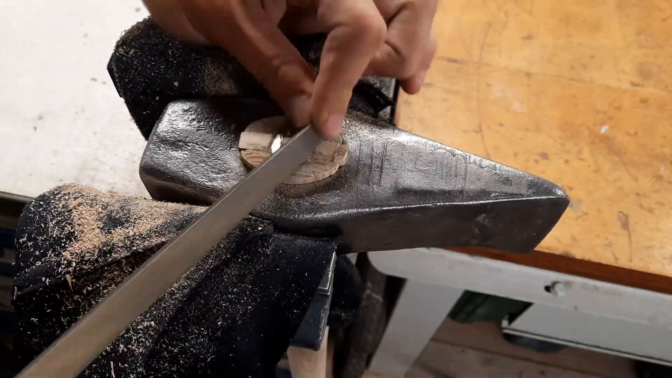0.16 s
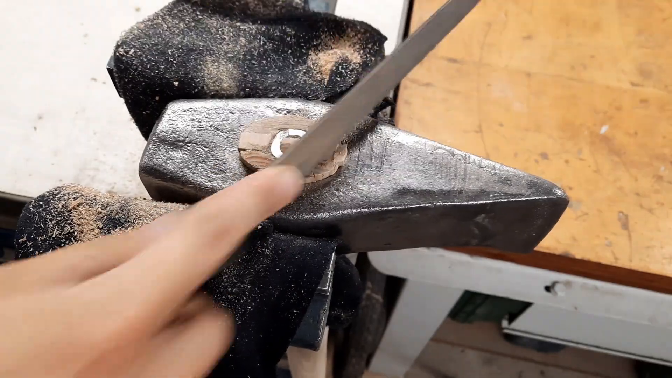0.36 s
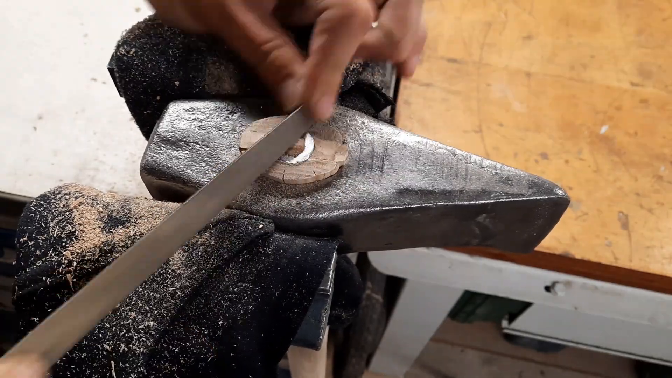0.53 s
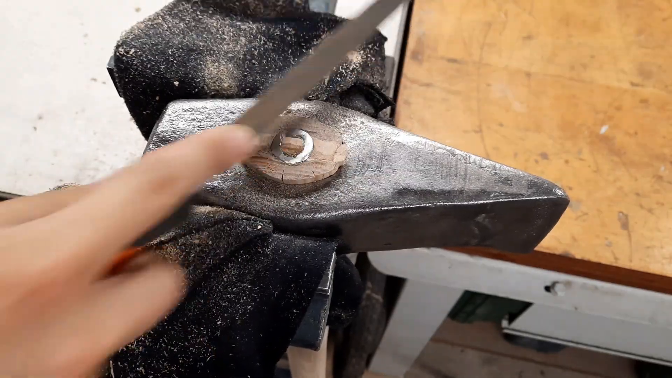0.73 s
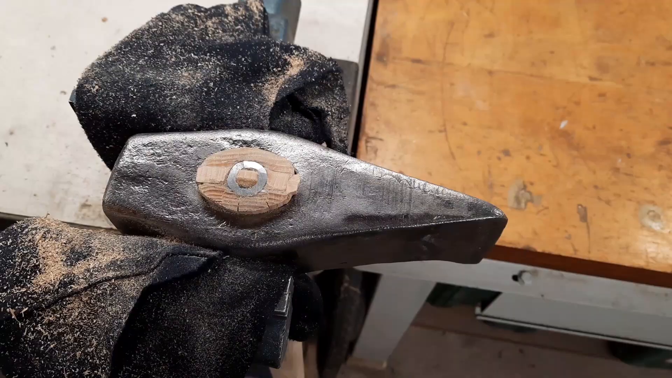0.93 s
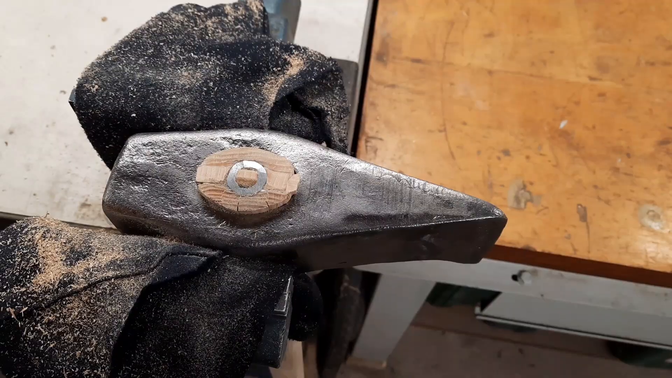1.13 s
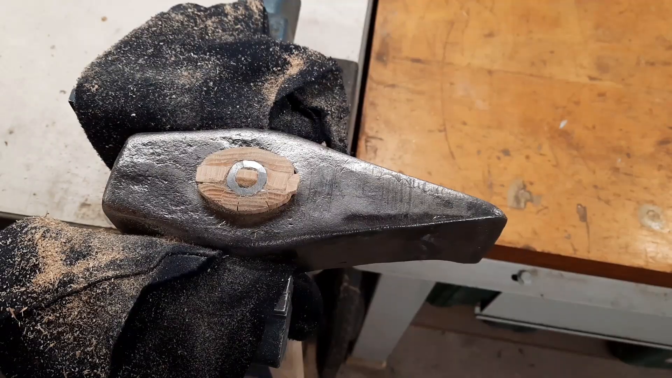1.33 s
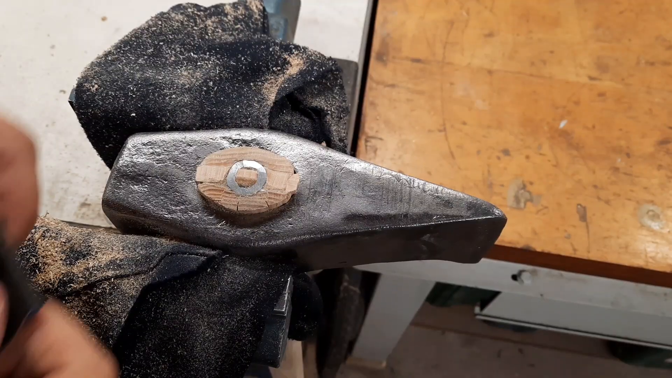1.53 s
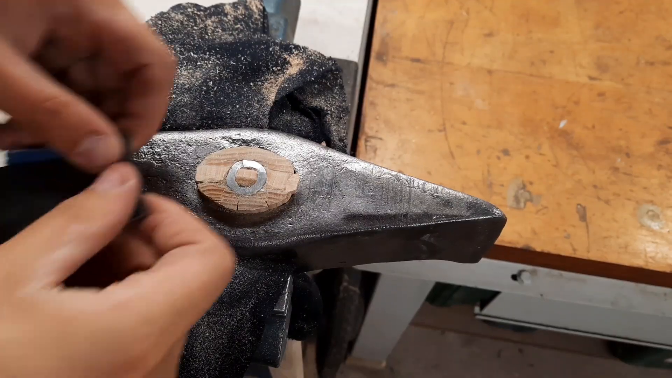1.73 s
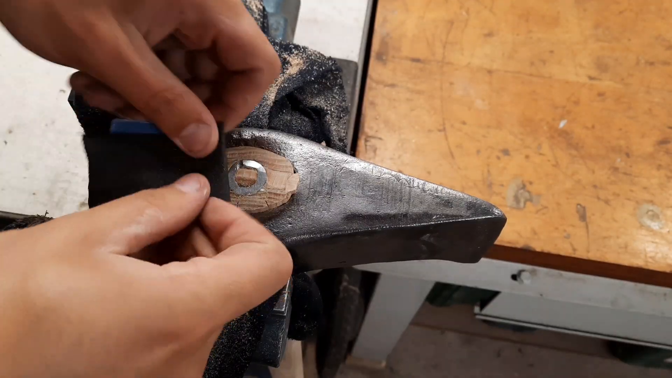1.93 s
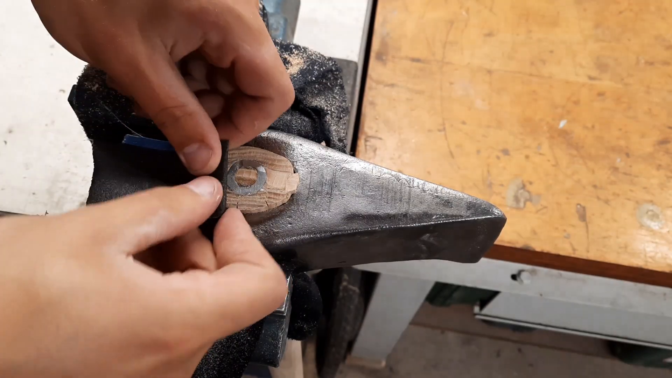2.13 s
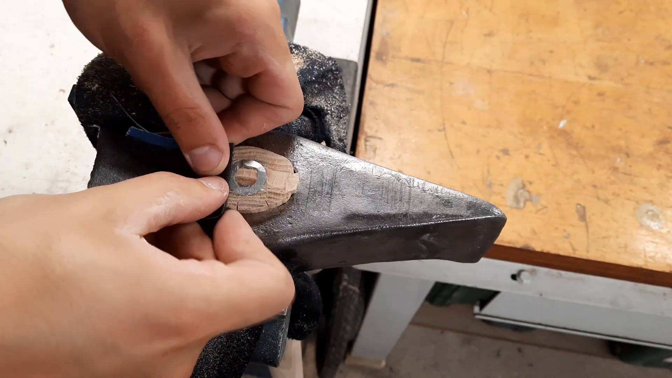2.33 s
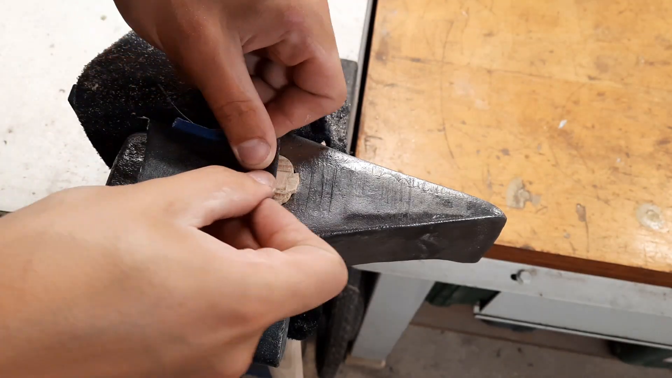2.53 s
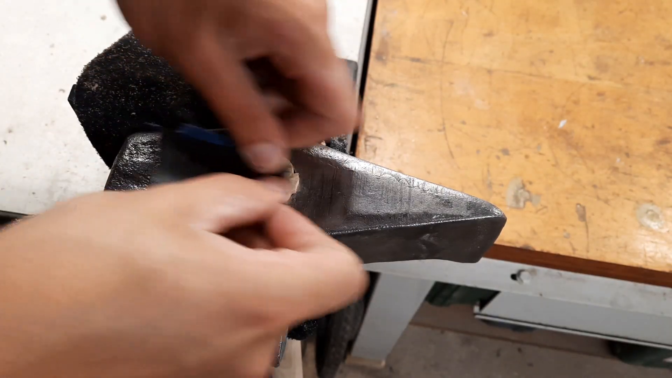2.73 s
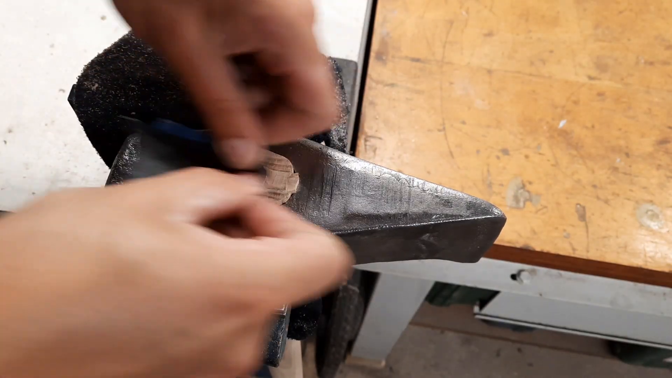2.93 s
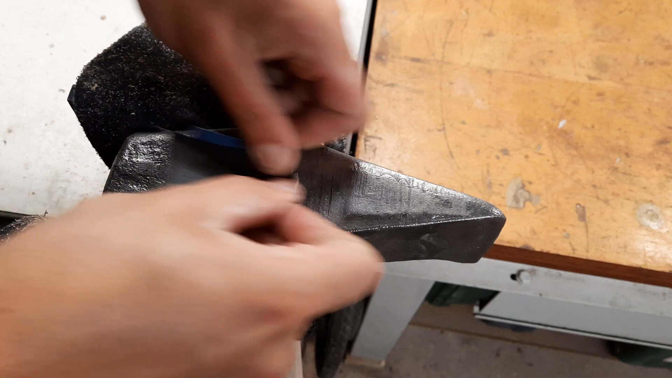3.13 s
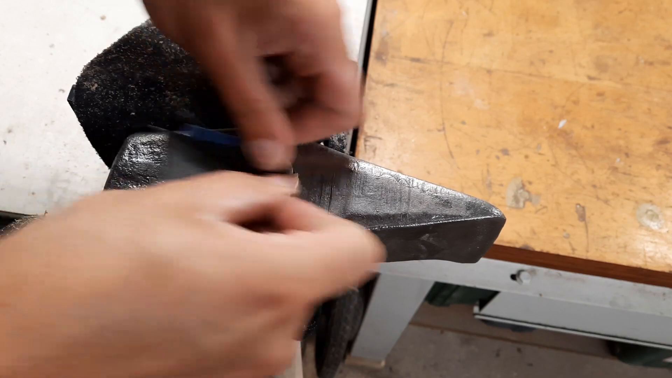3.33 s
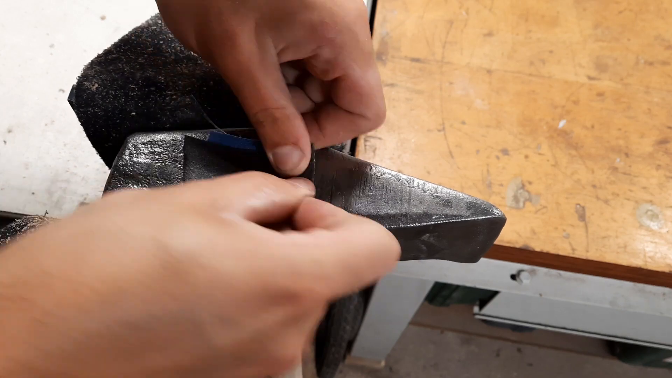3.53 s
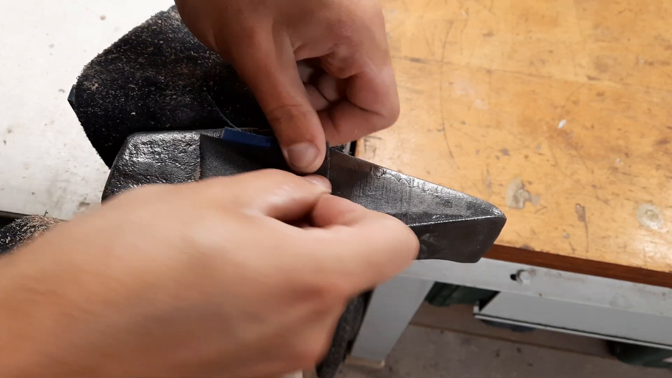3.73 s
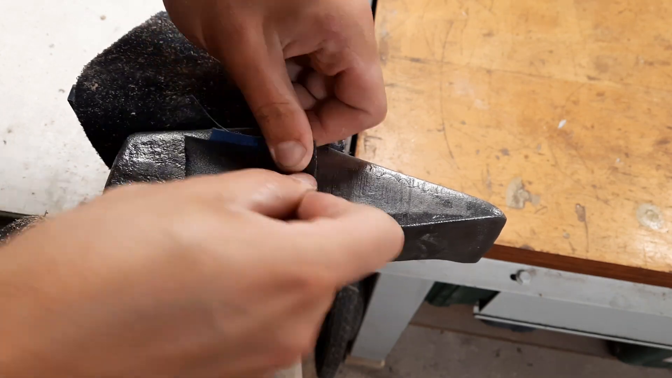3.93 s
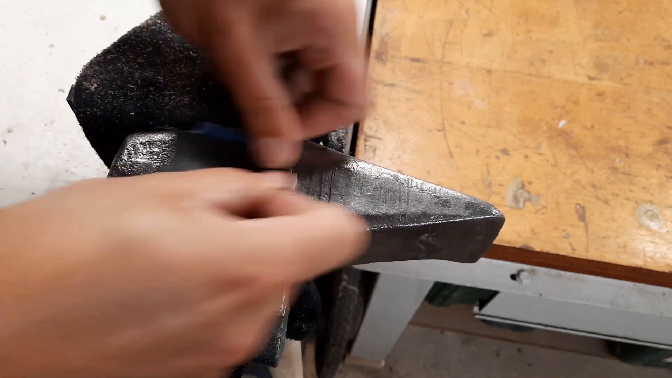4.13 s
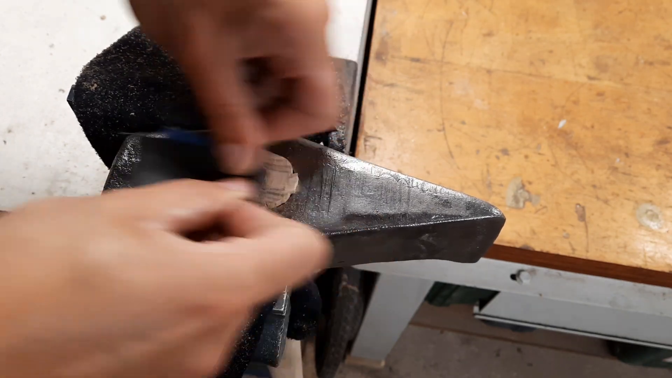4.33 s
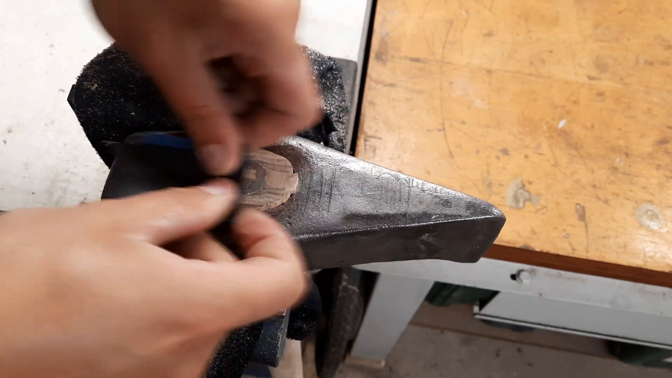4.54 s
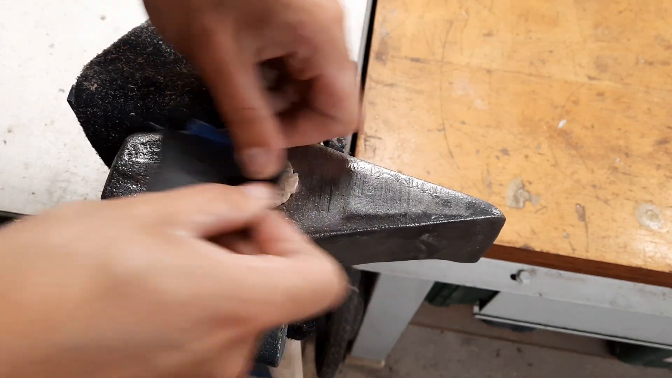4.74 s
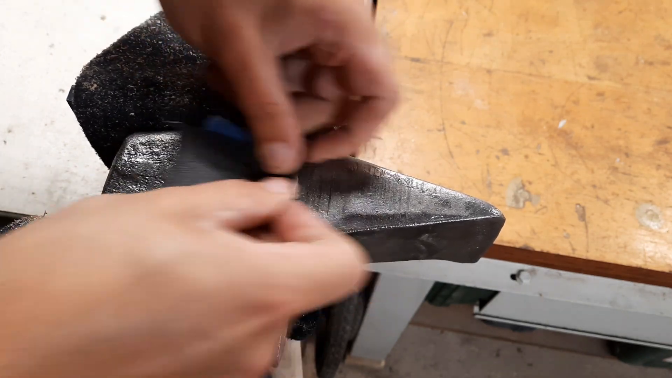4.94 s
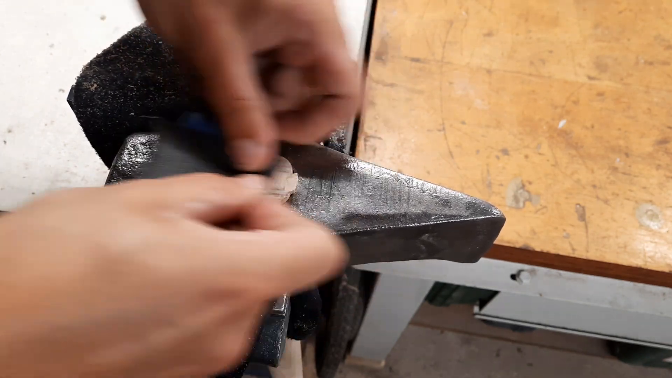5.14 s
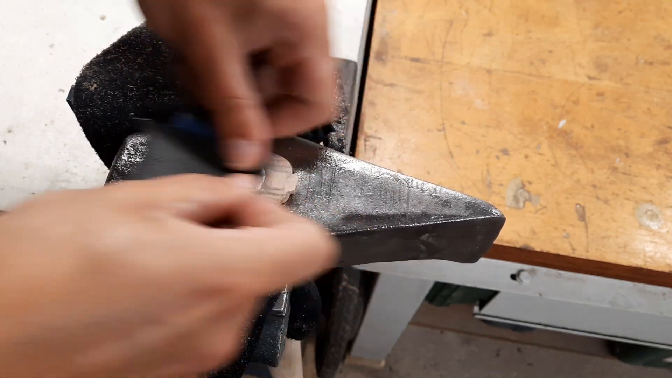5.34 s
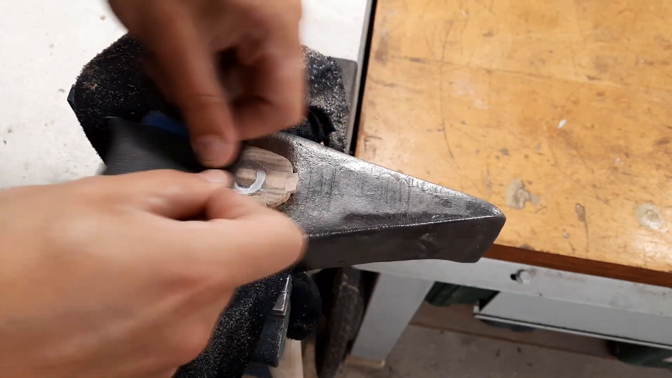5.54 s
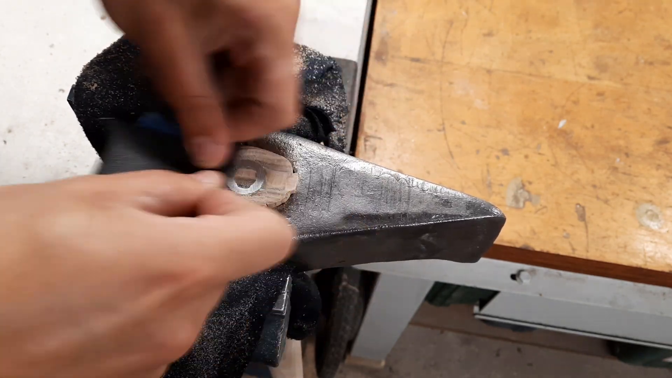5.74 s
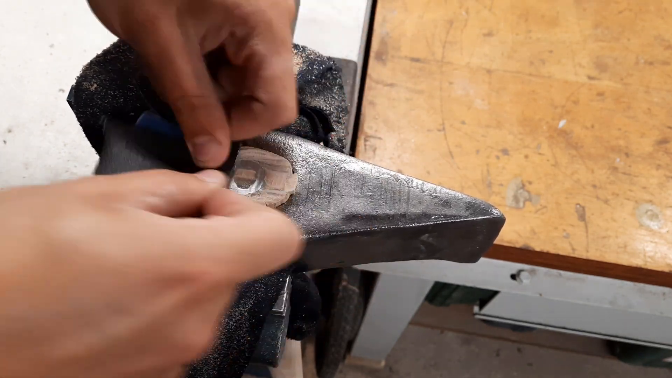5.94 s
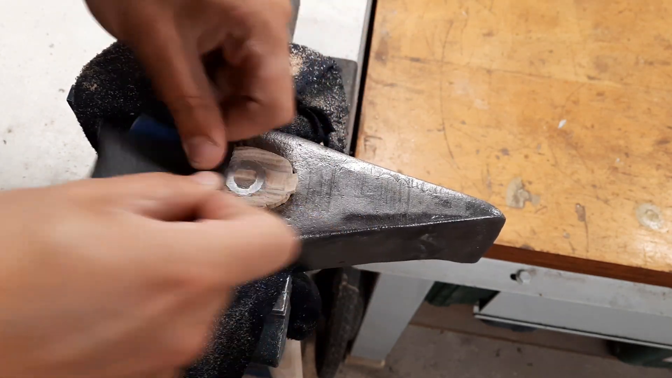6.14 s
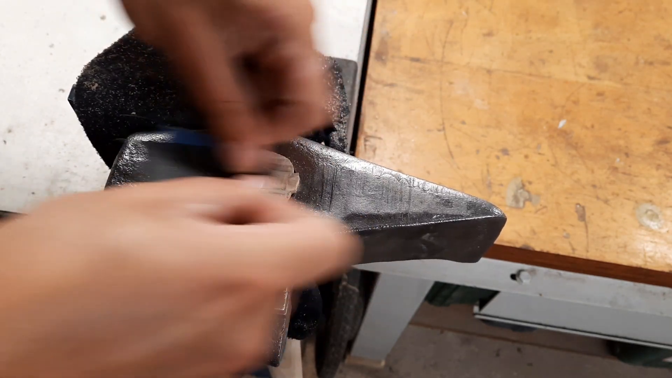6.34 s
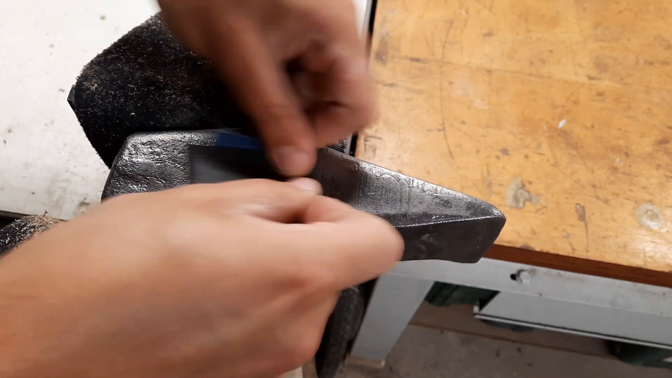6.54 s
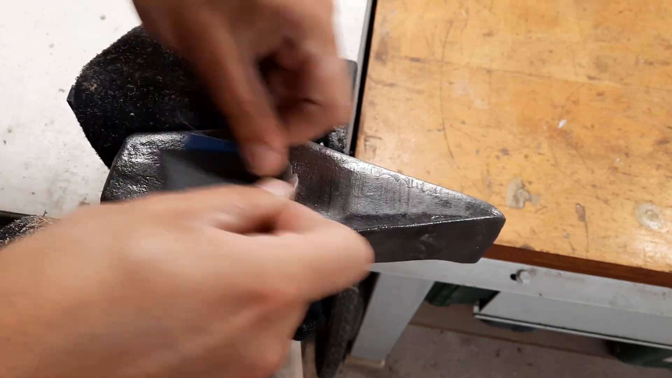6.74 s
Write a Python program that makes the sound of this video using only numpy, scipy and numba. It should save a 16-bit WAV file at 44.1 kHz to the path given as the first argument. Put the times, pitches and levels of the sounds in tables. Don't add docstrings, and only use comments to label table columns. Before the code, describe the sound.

Two whistling file strokes tear wood, a brief hush, rustling abrasive paper with woody bumps, then rapid dry back-and-forth sanding in a quiet workshop.

```python
import sys
import numpy as np
from scipy import signal
from scipy.fft import rfft, irfft, next_fast_len
from scipy.io import wavfile
from scipy.ndimage import uniform_filter1d
from numba import njit

SR = 44100
rng = np.random.default_rng(int(sys.argv[2]) if len(sys.argv) > 2 else 0)


def unload_wav(signal):
    wavfile.write(
        sys.argv[1],
        SR,
        np.round(np.clip(np.atleast_2d(signal).T, -1, 1) * 32767).astype(np.int16),
    )


def level_to_linear(level):
    exponent = np.asarray(level, float) / 20
    return 10 ** exponent


N = 302967
T = np.arange(N) / SR
FILE_END_S, PAPER_START_S = .865, .888
LAG = 5

# f/Hz, level/dB per Hz
AIR_COLOUR = [(15, -31), (40, -8), (60, 0), (446, 0.5), (1460, -13.5), (2570, -12), (3360, -19),
              (15600, -19.5)]
# f/Hz, level difference/dB
LEFT_COLOUR = [(60, 4), (110, -0.5), (200, 1.5), (380, 1.5), (700, 2.5), (1290, 2.5), (2380, 2.5),
               (4400, 3.5), (8120, 0), (15000, 6)]

# t/s, level/dB, 20 dB rise/s, 20 dB fall/s, f/Hz
PANEL_BOOMS = [
    (1.04, -39, .012, .04, 430),
    (1.055, -36, .025, .04, 415),
    (1.48, -33, .003, .07, 420),
    (1.518, -30, .04, .06, 365),
    (2.212, -32, .005, .12, 392),
    (2.33, -42, .1, .06, 378),
    (2.45, -56, .1, .03, 410),
    (6.793, -35, .012, .03, 450),
    (6.818, -37, .015, .07, 420),
]
# t/s, level/dB, 20 dB rise/s, 20 dB fall/s, f/Hz
FRAME_THUDS = [
    (1.06, -38, .04, .05, 215),
    (1.535, -51, .07, .05, 247),
    (2.215, -31, .006, .13, 132),
    (2.32, -34, .1, .15, 128),
    (6.797, -39, .015, .03, 200),
    (6.828, -37, .02, .07, 130),
]
# t/s, level/dB, 20 dB rise/s, 20 dB fall/s, f/Hz
WOOD_KNOCKS = [
    (1.043, -42, .015, .035, 1150),
    (1.48, -34, .003, .03, 1640),
    (1.51, -39, .025, .045, 1150),
    (2.212, -36, .005, .12, 720),
    (6.79, -37.5, .008, .04, 1380),
    (6.796, -38, .012, .06, 750),
]

# t/s, level/dB, 20 dB rise/s, 20 dB fall/s, stiff-fold f/Hz
PAPER_RUBS = [(.889, -55.5, .003, .08, 3630), (1.009, -49, .07, .11, 3750), (1.053, -50, .1, .07, 3160),
              (1.225, -61, .07, .03, 4180), (1.245, -51, .004, .1, 4040), (1.3, -46, .09, .14, 4250),
              (1.396, -46, .004, .022, 4150), (1.422, -38, .008, .05, 4300),
              (1.452, -34.5, .05, .025, 4340), (1.51, -41, .07, .06, 2600), (1.56, -45, .03, .04, 2600),
              (1.626, -44, .012, .025, 4830), (1.665, -54, .01, .09, 2650), (1.79, -59, .06, .04, 2890),
              (1.826, -42.5, .022, .03, 2600), (1.896, -48, .004, .08, 3730),
              (1.945, -44.5, .05, .07, 2700), (2.026, -53, .006, .05, 3990), (2.056, -42, .005, .08, 3000),
              (2.095, -47, .08, .15, 2500), (2.236, -49, .005, .15, 3300), (2.31, -46, .1, .1, 4230),
              (2.413, -47, .015, .03, 5340), (2.45, -53, .005, .05, 5000), (6.868, -31, .065, .1, 4710)]
# f/Hz, level/dB per Hz
PAPER_COLOUR = [(600, -30), (1300, -10), (2840, -9.5), (8780, -8.5), (14400, -9.5), (15600, -9)]
# t/s, peak level/dB, f/Hz
CREASE_SNAPS = [(0.8904, -35, 3660), (1.1752, -41, 3980), (1.2204, -38, 4380), (1.2286, -30, 4360),
                (1.2436, -16, 4250), (1.2755, -20, 4590), (1.2984, -20, 4250), (1.3224, -29, 4240),
                (1.3957, -21, 4270), (1.783, -38, 3200), (1.7609, -37, 5250), (1.8951, -29, 5080),
                (1.9405, -14, 4000), (1.9769, -24.5, 5340), (2.0243, -22, 3310), (2.0115, -35, 4200),
                (2.2343, -30, 1650), (2.2964, -39, 1780), (2.3176, -12, 9000), (2.4124, -21, 6300),
                (2.4174, -28, 5720), (2.4483, -23, 6350), (2.4594, -25, 4350), (2.7397, -18, 8850),
                (2.833, -26, 7920), (4.219, -10, 4180), (4.56, -15.5, 5860), (4.7394, -17.5, 5300),
                (4.8236, -11, 6080), (4.9114, -14, 8870)]
# t/s, peak level/dB, f/Hz
GRIT_TICKS = [(1.281, -27, 11000), (1.285, -30, 9000), (1.3125, -32, 13000), (1.354, -32, 4300),
              (1.4795, -24, 11000), (1.553, -30, 6000), (1.5974, -40, 3000), (1.615, -38, 12000),
              (1.6208, -27, 10000), (1.6622, -42, 6000), (1.7216, -48, 12000), (1.7465, -40, 13000),
              (1.865, -42, 5500), (2.0543, -30, 6000), (2.1325, -32, 13500), (2.2415, -34, 13000),
              (2.2758, -30, 13000), (2.2928, -28, 12000), (2.3005, -29, 12500), (2.309, -27, 12500),
              (2.3225, -26, 11000), (2.352, -36, 13000), (2.407, -33, 9000), (2.583, -22, 11000),
              (2.692, -21, 9000)]
# t/s, level/dB, 20 dB
# rise/s, 20 dB fall/s
DRAGS = [
    (.51, -60, .09, .07),
    (1.048, -45, .06, .05),
    (1.31, -53, .1, .13),
    (1.5, -41, .06, .05),
    (1.828, -54, .02, .025),
    (2.06, -45, .012, .16),
    (2.212, -37, .006, .14),
    (6.8, -46, .03, .12),
]
# f/Hz, level/dB per Hz
DRAG_COLOUR = [(24, -62), (40, -21), (818, -0.5), (937, -9.5), (1250, -4.5), (1500, -16.5), (1950, -30),
               (3300, -120)]

# landing t/s, length/s, level/dB, top tooth f/Hz, extra whistle level/dB
FILE_STROKES = [
    (-.172, .21, -31.5, 1330, -3),
    (.203, .217, -34.5, 1590, 2.5),
    (.572, .19, -31.5, 1470, 3),
]
# t/s, peak level/dB, f/Hz
FILE_LANDINGS = [
    (0.2039, -45, 2230),
    (0.5725, -21, 3670),
]
# share of its length, share of top speed, pressure level/dB
STROKE_COURSE = [(0, .55, -15), (.12, .56, -15), (.24, .62, -11), (.26, .73, -8), (.31, .76, -4),
                 (.33, 1, -4), (.43, 1, 0), (.66, .955, -1), (.84, .96, -11), (1, .95, -38)]
# share of its length, level/dB, 20 dB rise/share, 20 dB fall/share
WHISTLE_SWELLS = [
    (.01, -8, .01, .5),
    (.22, -14, .2, .15),
    (.43, 7, .1, .2),
    (.6, -4.5, .5, .3),
]
# share of its length, level/dB, 20 dB rise/share, 20 dB fall/share
VICE_SWELLS = [
    (.2, -19, .25, .3),
    (.76, -12, .5, .6),
    (1.15, -28, .5, .45),
]
# f/Hz, level/dB per Hz
RASP_COLOUR = [(290, -49), (500, -22.5), (630, -30), (1100, -12), (1200, -24), (1260, -16.5), (1540, -0.5),
               (2140, -13.5), (3810, -15), (6670, -21), (15600, -20)]
# f/Hz, width/Hz, level/dB
BLADE_MODES = [(2890, 50, -16), (3890, 14, 22), (7190, 95, -1.5), (10240, 50, 4), (12600, 110, -10),
               (14800, 71, 7), (15300, 48, -2)]
# f/Hz, width/Hz, level/dB
BENDING_MODES = [(822, 35, 0), (930, 35, -2), (1093, 40, -1), (1385, 40, -4), (1490, 30, -2),
                 (1580, 30, -3), (1760, 45, -6)]
# f/Hz, level/dB per Hz
VICE_COLOUR = [(26, -34), (48, -18), (70, 0.5), (167, -8.5), (454, -6), (512, -7), (629, -19), (800, -11),
               (1040, -34), (1760, -120)]

# start t/s, length/s, level/dB
PULLS = [(2.646, .068, -32), (2.752, .078, -27.5), (2.963, .062, -26), (3.151, .06, -24.5),
         (3.346, .059, -25), (3.528, .055, -26.5), (3.708, .058, -25), (3.905, .058, -26.5),
         (4.086, .059, -28), (4.272, .057, -25.5), (4.461, .056, -28), (4.55, .079, -30.5),
         (4.667, .087, -31), (4.86, .068, -27.5), (5.069, .059, -30), (5.262, .057, -27.5),
         (5.448, .064, -26), (5.639, .063, -25.5), (5.828, .064, -26), (6.011, .067, -27.5),
         (6.194, .065, -26.5), (6.379, .057, -24), (6.558, .062, -27), (6.653, .067, -25.5),
         (6.756, .06, -28.5)]
# start t/s, length/s, level/dB
PUSHES = [(2.472, .115, -31), (2.854, .077, -26), (3.057, .065, -24.5), (3.247, .067, -26),
          (3.438, .063, -27), (3.62, .063, -26.5), (3.811, .065, -26), (3.995, .065, -26.5),
          (4.178, .06, -26), (4.36, .065, -28.5), (4.778, .065, -29.5), (4.967, .072, -30.5),
          (5.169, .066, -30), (5.353, .067, -27), (5.542, .066, -25), (5.73, .068, -25.5),
          (5.922, .063, -26.5), (6.102, .065, -26), (6.291, .06, -25.5), (6.474, .063, -27)]
# t/s, share of a pull, share of a push
TOP_MOMENTS = [
    (4.7, .3, .53),
    (4.85, .48, .56),
]
# t/s, treble level/dB in a pull, treble level/dB in a push
GRIT_WEAR = [(2.5, -2.5, -3), (3.5, -1.7, -3.2), (4.8, -2.5, -3), (5.3, -3.5, -3.8), (5.75, -3.2, -3.5),
             (6, -2.2, -2.5)]
# f/Hz, level/dB per Hz
GRIT_COLOUR = [(180, -12), (300, -16), (391, -9.5), (642, -6.5), (1700, -10.5), (2010, -7), (2940, -5),
               (4590, 0), (5420, 0.5), (7050, 1), (11600, -2), (15600, -1.5)]
# t/s, level/dB
HAND_HOLLOW = [(2.4, -47), (3.5, -13.5), (4.5, -11), (5.5, -10.5), (6.2, -5.5), (6.87, -6)]
# t/s, peak level/dB, f/Hz
GRIT_BITES = [(2.4778, -23, 9810), (2.6484, -23, 10200), (2.7591, -19, 8930), (2.8629, -17, 7280),
              (2.9687, -17, 11800), (3.0614, -16, 7030), (3.1542, -14, 8610), (3.3518, -15, 8110),
              (3.5334, -15, 10500), (3.7145, -14, 5490), (3.9075, -15, 6280), (4.0088, -15, 8580),
              (4.0966, -18, 6980), (4.1834, -17, 5870), (4.2782, -16, 10200), (4.364, -18, 5340),
              (4.4657, -18, 6630), (4.6783, -19, 6790), (4.8718, -17, 6330), (5.2704, -17, 5610),
              (5.3617, -18, 5940), (5.4645, -11, 6150), (5.5538, -16, 5500), (5.6471, -15, 6020),
              (5.8351, -16, 6820), (5.9244, -17, 5080), (6.0197, -17, 6910), (6.2003, -17, 5640),
              (6.2966, -13, 5270), (6.3844, -14, 5290), (6.4862, -16, 7530), (6.566, -16, 7170),
              (6.6598, -13, 7470), (6.7614, -17, 6670)]
# t/s, frame level/dB, top board level/dB
HAND_SHAKE = [(2.47, -58, -62), (2.65, -62, -64), (3.24, -48, -54), (3.7, -48, -53), (4.25, -48, -53),
              (4.48, -53, -57), (4.6, -45, -56), (4.71, -59, -62), (5.2, -56, -57), (5.32, -51, -51),
              (5.5, -53, -54), (5.58, -44, -52), (5.85, -46, -49), (6, -45, -52), (6.3, -48, -51),
              (6.77, -50, -55), (6.8, -41, -46), (6.87, -43, -48)]
# f/Hz, width/Hz, level/dB
FRAME_MODES = [(74, 18, 3), (225, 45, -4), (126, 20, 1.5)]
# f/Hz, width/Hz, level/dB
BOARD_MODES = [(290, 60, 0), (360, 60, 1), (430, 70, 0), (560, 140, -2)]


def unit(x):
    return x / np.sqrt(np.mean(x ** 2))


def played(rows):
    s, *columns = np.transpose(rows)
    out, inside = np.zeros((len(columns), N)), np.zeros(N)
    i = int(s[0] * SR)
    out[:, i:] = [np.interp(T[i:], s, c) for c in columns]
    inside[i:int((s[-1] + .012) * SR)] = 1
    return [*out, signal.lfilter([.05], [1, -.95], inside)]


def shade(x, spectrum, scale=1):
    hz, db = np.transpose(spectrum)
    size = next_fast_len(N)
    log_f = np.log(np.arange(size // 2 + 1) * SR / size + 1)
    gain = level_to_linear(scale * np.interp(log_f, np.log(hz), db))
    return irfft(rfft(x, size) * gain, size)[..., :N]


@njit
def svf(x, g, k):
    y, b, l = np.empty(len(x)), 0., 0.
    for i in range(len(x)):
        v = (b + g[i] * (x[i] - l)) / (1 + g[i] * (g[i] + k[i]))
        b, l, y[i] = 2 * v - b, l + 2 * g[i] * v, k[i] * v
    return y


def band(x, hz, width):
    hz, flat = np.clip(hz, 20, .45 * SR), np.ones(x.shape[1])
    return np.array([svf(c, np.tan(np.pi * hz / SR) * flat, width / hz * flat) for c in x])


def modes(x, table):
    return sum((-1) ** k * level_to_linear(db) * band(x, hz, width) for k, (hz, width, db) in enumerate(table))


def walk(rate):
    k = int(SR / rate)
    return 0.83 * uniform_filter1d(np.repeat(rng.standard_normal(N // k + 1), k), k)[:N]


def rub(alike, grains=0., scatter_db=0., grain_db=-99., flicker_db=0., flicker_rate=300.):
    draw = rng.standard_normal((3, N))
    caught = rng.random(N) < grains / SR
    strength = level_to_linear(scatter_db * np.minimum(rng.exponential(size=N), 2))
    catch = signal.lfilter([1], [1, -.9], caught * strength)
    common = np.array([draw[0], np.roll(draw[0], LAG)])
    alike = np.clip(alike, 0, 1)
    noise = np.sqrt(alike) * common + np.sqrt(1 - alike) * draw[1:]
    return unit(noise * (1 + level_to_linear(grain_db) * catch) * level_to_linear(flicker_db * walk(flicker_rate)))


def clicks(table, width, t60, hiss_db):
    out, t = np.zeros((2, N)), T[:1500]
    for s, db, hz in table:
        burst = rng.standard_normal((3, len(t))) * np.exp(-np.log(1000) * t / t60)
        burst[0, 0] = 5
        burst = burst[1:] * .4 + burst[0]
        ringing = band(band(burst, hz, width), hz, 2 * width)
        burst = ringing + level_to_linear(hiss_db) * np.diff(burst, prepend=0)
        i = int(s * SR)
        burst[1] = np.roll(burst[1], LAG)
        out[:, i:i + len(t)] += level_to_linear(db) * burst / np.abs(burst.mean(axis=0)).max()
    return out


def steady(x, span):
    return x / np.sqrt(uniform_filter1d(np.mean(x ** 2, axis=0), size=span) + 1e-12)


def swells(rows, t=T):
    rows, coarse = np.array(rows), t[::32]
    away = np.array([np.maximum((r[0] - coarse) / r[2], (coarse - r[0]) / r[3]) for r in rows])
    power = level_to_linear(2 * (rows[:, 1:2] - np.minimum(20 * away ** 1.6, 150)))
    total = power.sum(axis=0)
    pitch = rows[:, -1] @ power / total
    return [np.interp(T, T[::32], c) for c in (np.sqrt(total), pitch)]


def patchy(x, db, rate):
    centres_hz = 1000 * 2 ** np.arange(0, 3.7, 1 / 3)
    return x + sum((level_to_linear(db * walk(rate)) - 1) * band(x, hz, hz / 5) for hz in centres_hz)


def off_hand(x, lag_s, sway_s, db):
    echo = [np.interp(T - lag_s - sway_s * uniform_filter1d(walk(14), size=2000), T, c) for c in x]
    return x + level_to_linear(db) * np.array(echo)


def still_air():
    level_db = np.where(T < PAPER_START_S, -76, -71.5)
    return level_to_linear(level_db) * unit(shade(rub(.3, flicker_db=2., flicker_rate=12), AIR_COLOUR))


def room(x):
    t60_s = .18
    t = T[:int(t60_s * SR)]
    tail = rng.standard_normal((2, len(t))) * np.exp(-np.log(1000) * t / t60_s) * (t > .004)
    tail = signal.lfilter([1], [1, -.4], tail)
    tail /= np.sqrt(np.sum(tail ** 2, axis=1, keepdims=True))
    return signal.fftconvolve(x.mean(axis=0)[None], tail, axes=1)[:, :N]


def bumps():
    booming, boom_hz = swells(PANEL_BOOMS)
    thudding, thud_hz = swells(FRAME_THUDS)
    knocking, knock_hz = swells(WOOD_KNOCKS)
    judder = rub(0.81, flicker_db=3.5, flicker_rate=80)
    boom = steady(band(band(judder, boom_hz, 62), boom_hz, 220), span=1200)
    thud = band(band(judder, thud_hz, 39), thud_hz, 150)
    thud = thud + level_to_linear(-5) * band(judder, 72, 25) + level_to_linear(-7) * band(judder, 1.9 * thud_hz, 45)
    thud = steady(thud, span=2000)
    knock = steady(band(band(judder, knock_hz, 400), knock_hz, 600), span=900)
    return level_to_linear(-2.4) * booming * boom + level_to_linear(-3.6) * thudding * thud + level_to_linear(-1.8) * knocking * knock


def paper():
    gain, fold_hz = swells(PAPER_RUBS)
    slide = rub(.25, 500, 2.5, -8., 2.5, 120)
    fold = level_to_linear(-6 - 3 * (fold_hz - 3700) / 1000)
    folds = unit(band(slide, fold_hz, 650)) + level_to_linear(-5) * unit(band(slide, 1.9 * fold_hz, 1200))
    sheet = patchy(unit(shade(slide, PAPER_COLOUR)), db=3.5, rate=18) + fold * folds
    drag = unit(shade(rub(0.39, flicker_db=8.0, flicker_rate=65), DRAG_COLOUR))
    cracks = level_to_linear(-4) * clicks(CREASE_SNAPS, 3000, .006, -8)
    cracks = cracks + level_to_linear(-2) * clicks(GRIT_TICKS, 6000, .005, -10)
    return level_to_linear(-1.2) * gain * sheet + level_to_linear(-5.2) * swells(DRAGS)[0] * drag + cracks


def file():
    strokes = np.array(FILE_STROKES)
    current = np.searchsorted(strokes[:, 0], T + .004) - 1
    land, length, db, top_hz, sing_db = strokes[current].T
    u = (T - land) / length
    share, speed, pressure_db = np.transpose(STROKE_COURSE)
    tooth_hz = top_hz * np.interp(u, share, speed)
    lifted_db = np.minimum(40 * np.maximum(u - 1, 0) + 2000 * np.maximum(-u, 0), 99)
    press = level_to_linear(np.interp(u, share, pressure_db) - lifted_db)
    press = press * level_to_linear(9 * (sing_db - 3) * np.clip(1 - u / .22, 0, 1))

    tear = rub(0.086, 900, 6.8, -15.0, 0.83, 250)
    blade = level_to_linear(-9.5) * np.clip(u / .65, .2, 1) ** 2 * unit(modes(tear, BLADE_MODES))
    rasp = unit(unit(shade(tear, RASP_COLOUR)) + blade)

    teeth = rub(0.4, 300, 8.4, -3.0, 3.8, 90.5)
    tone = steady(band(band(teeth, tooth_hz, 75), tooth_hz, 200), span=1300)
    whistle = unit(tone + level_to_linear(-13) * unit(band(teeth, tooth_hz, 600)))
    bending = modes(band(band(teeth, tooth_hz, 300), tooth_hz, 500), BENDING_MODES)
    whistle = whistle + level_to_linear(-9) * steady(bending, span=1300)

    vice = unit(shade(rub(.75, flicker_db=3., flicker_rate=40), VICE_COLOUR))
    ring = np.sqrt(2) * np.sin(2 * np.pi * 2008 * T + np.array([[.7], [-.7]]))
    ring = level_to_linear(-65 - 75 * np.clip((u - 1) * length, 0, 1)) * ring
    body = level_to_linear(1.94) * press * rasp
    body = body + level_to_linear(sing_db - 0.9) * swells(WHISTLE_SWELLS, u)[0] * whistle
    body = body + level_to_linear(-3) * swells(VICE_SWELLS, u)[0] * vice
    return (T < PAPER_START_S) * (level_to_linear(db) * body + ring) + clicks(FILE_LANDINGS, 2500, 0.011, -44)


def strip_motion():
    speed, treble = np.full(N, 1e-7), np.zeros(N)
    tops, wear = np.transpose(TOP_MOMENTS), np.transpose(GRIT_WEAR)
    for way, strokes in enumerate((PULLS, PUSHES), start=1):
        for s, length, db in strokes:
            near = slice(int((s - .15) * SR), int((s + .3) * SR))
            u = (T[near] - s) / length
            top = np.interp(s, tops[0], tops[way])
            rise = np.maximum(1 - u / top, 0) ** 2.7
            fall = np.maximum((u - top) / (1 - top), 0) ** 2.3
            gain = level_to_linear(db + 2.5 - np.minimum(13.0 * (rise + fall), 90))
            treble[near] = np.where(gain > speed[near], np.interp(s, wear[0], wear[way]), treble[near])
            speed[near] = np.maximum(speed[near], gain)
    return speed, treble


def sanding():
    speed, treble = strip_motion()
    grit = unit(shade(rub(0.18, 700, 2.3, -17.0, 1.87, 350), GRIT_COLOUR))
    grit = unit(off_hand(grit, 0.0006977, 0.000204, -9))
    grit = unit(patchy(grit, db=1.8, rate=30))
    hollow_db, _ = played(HAND_HOLLOW)
    grit = grit + level_to_linear(hollow_db) * band(grit, 6150, 2470)
    fine = shade(grit, [(5000, -66), (9000, -12), (12000, -3.5)])
    low = shade(grit, [(1200, -1.5), (2500, -1), (5000, -28)])
    slow = uniform_filter1d(speed, size=1500)
    brightness = level_to_linear(2.4 * (uniform_filter1d(treble, size=400) + 3.5)) - 1
    hiss = speed * (grit + brightness * fine) + level_to_linear(-7) * slow * low

    frame_db, board_db, on = played(HAND_SHAKE)
    board = unit(modes(rub(0.6, flicker_db=4.0, flicker_rate=25), BOARD_MODES))
    frame = modes(rub(0.85, flicker_db=3.5, flicker_rate=20), FRAME_MODES)
    frame = unit(shade(frame, [(30, -12), (62, 0)]))
    pulse = (slow / (uniform_filter1d(slow, size=8000) + 1e-7)) ** 0.17
    hum = on * pulse * (level_to_linear(frame_db - 0.7) * frame + level_to_linear(board_db + 2.5) * board)
    bites = level_to_linear(-7) * clicks(GRIT_BITES, 6000, .02, -10)
    return hiss + bites + hum


def scene():
    sides = np.array([[.5], [-.5]])
    near = sanding() + (level_to_linear(-3.5 * sides) * file() + level_to_linear(3 * sides) * paper() + level_to_linear(2.5 * sides) * bumps())
    air = still_air()
    heard = 1. * ((T < FILE_END_S) | (T > PAPER_START_S))
    heard = np.maximum(uniform_filter1d(heard, size=130), .03)
    return (near + level_to_linear(-11.8) * room(near) + air) * heard


def roll_off(x):
    return signal.sosfilt(signal.butter(12, 17010, fs=SR, output="sos"), x)


def record(dry):
    top_hz = 15750
    mix = np.array([shade(dry[0], LEFT_COLOUR, .5), shade(dry[1], LEFT_COLOUR, -.5)])
    mix = shade(mix, [(top_hz - 100, 0), (top_hz + 150, -38), (top_hz + 900, -45)])
    return roll_off(mix)


dry = scene()
out = record(dry)
unload_wav(out)
```